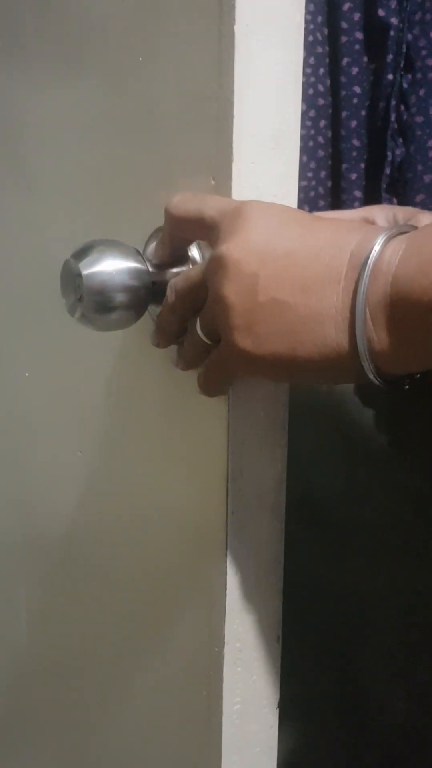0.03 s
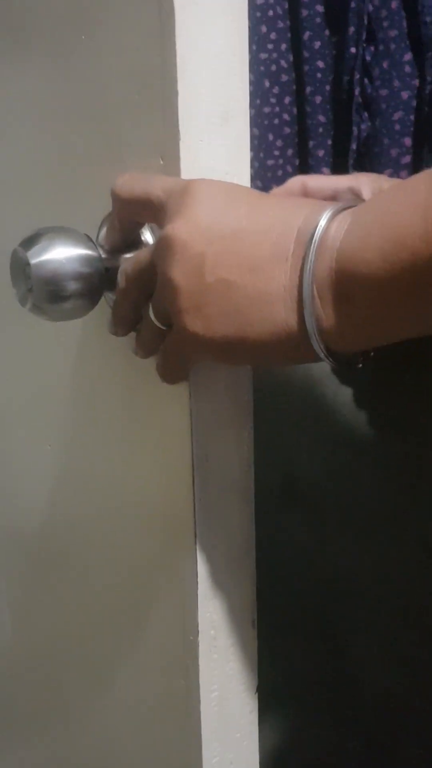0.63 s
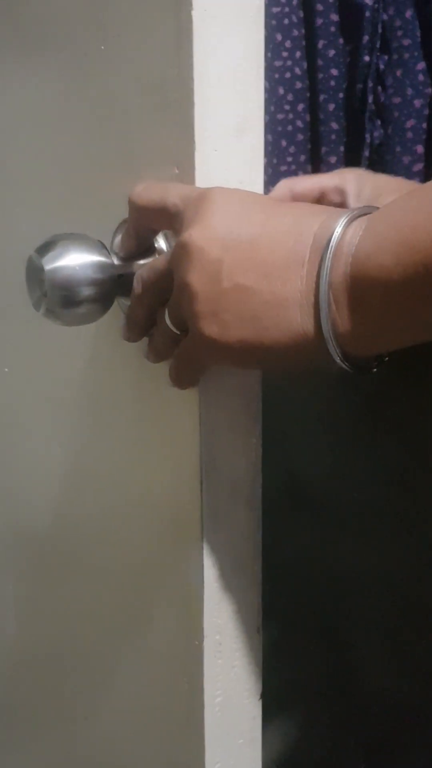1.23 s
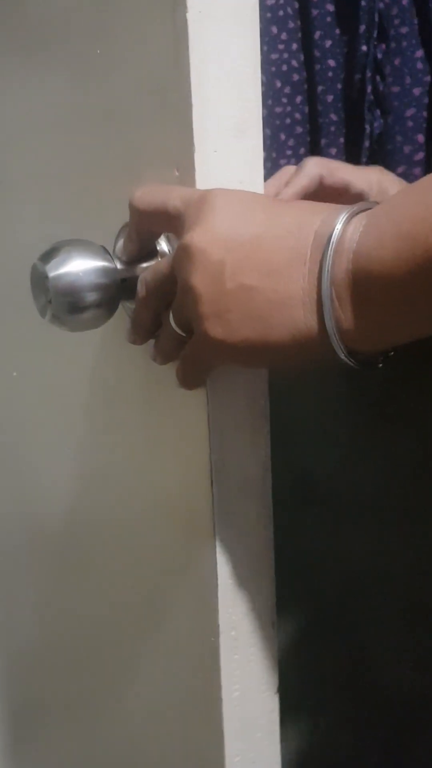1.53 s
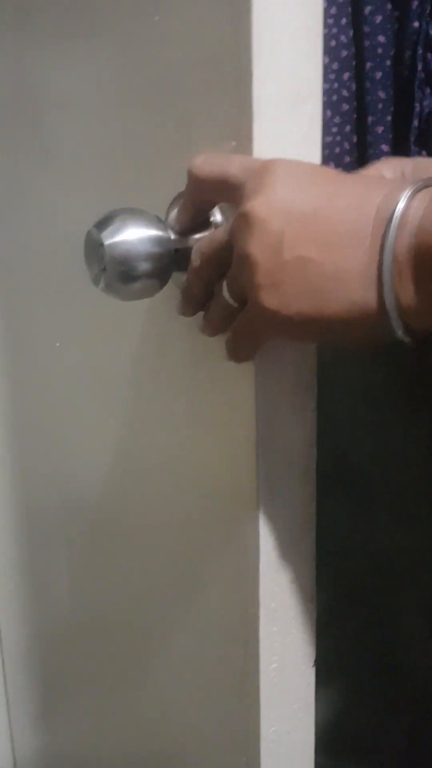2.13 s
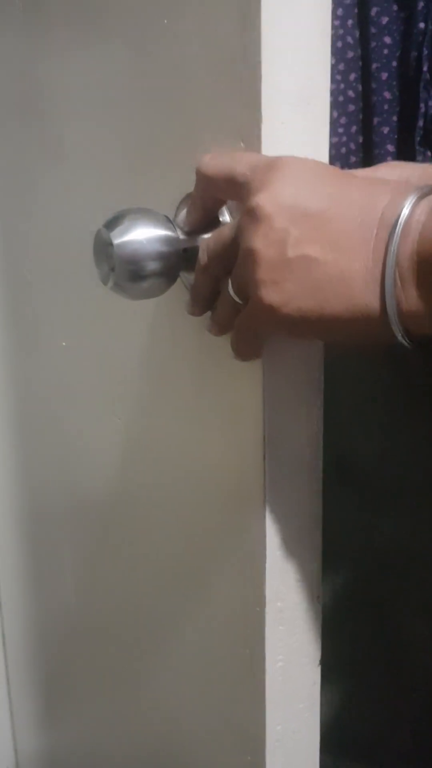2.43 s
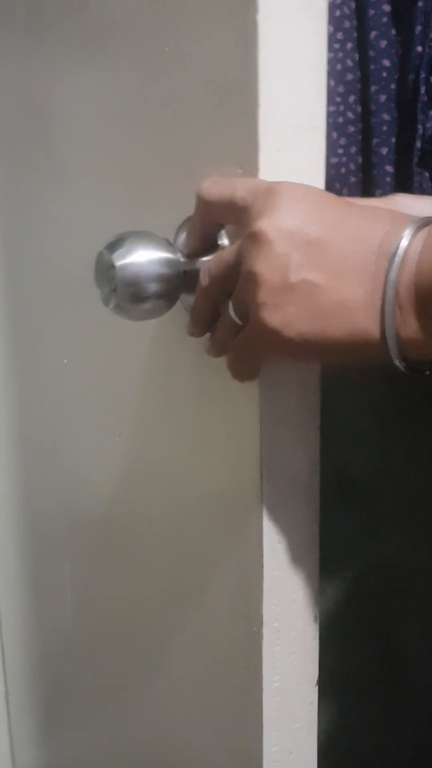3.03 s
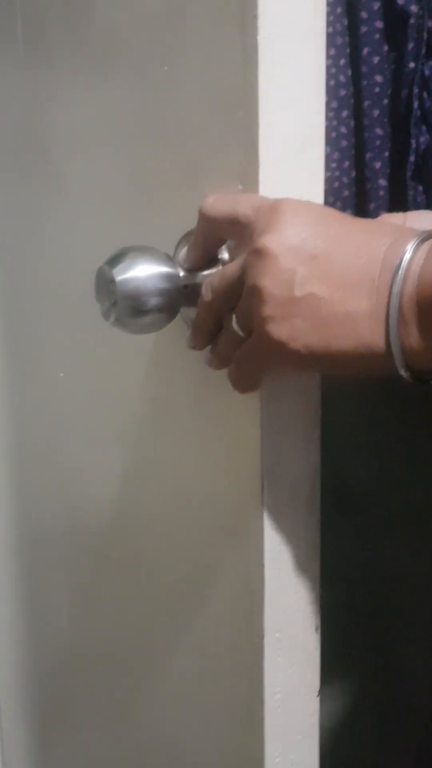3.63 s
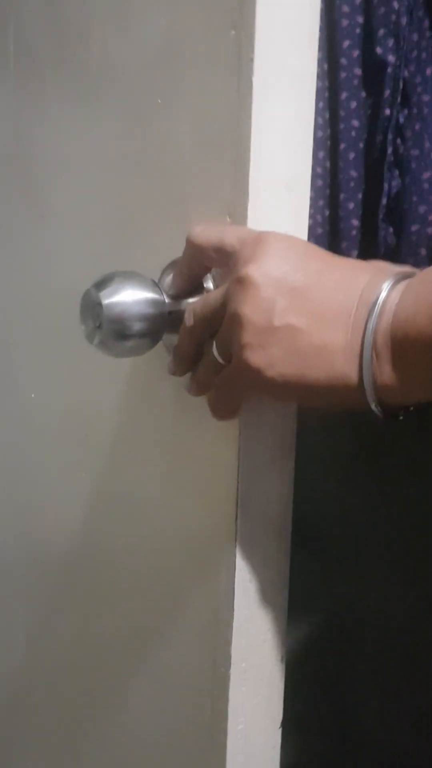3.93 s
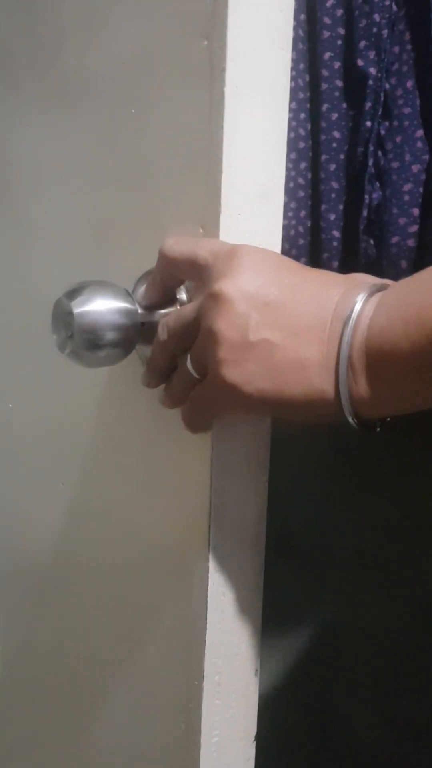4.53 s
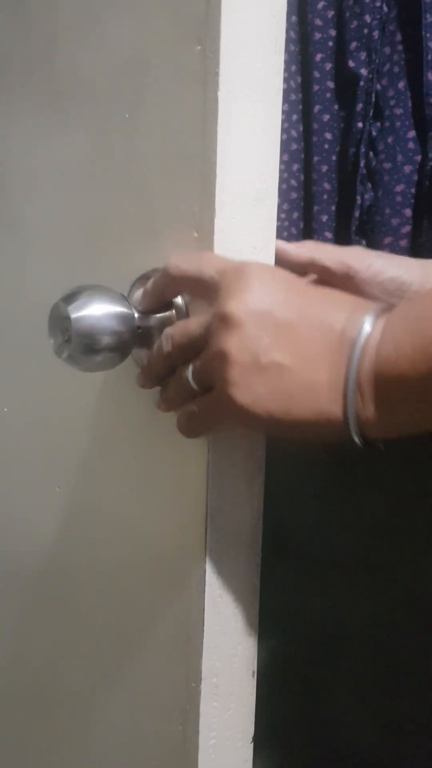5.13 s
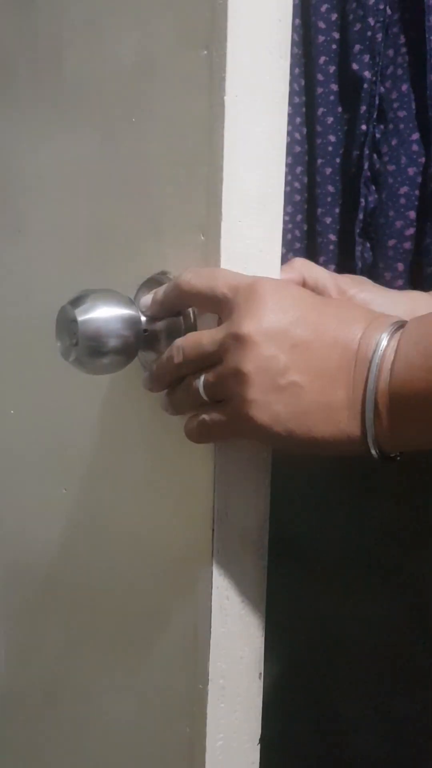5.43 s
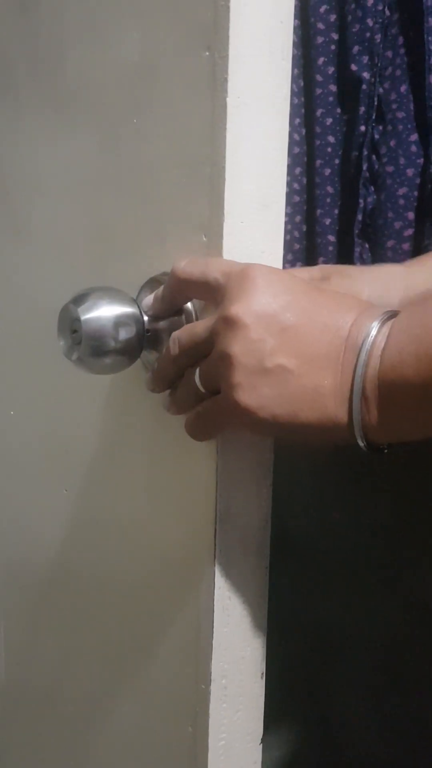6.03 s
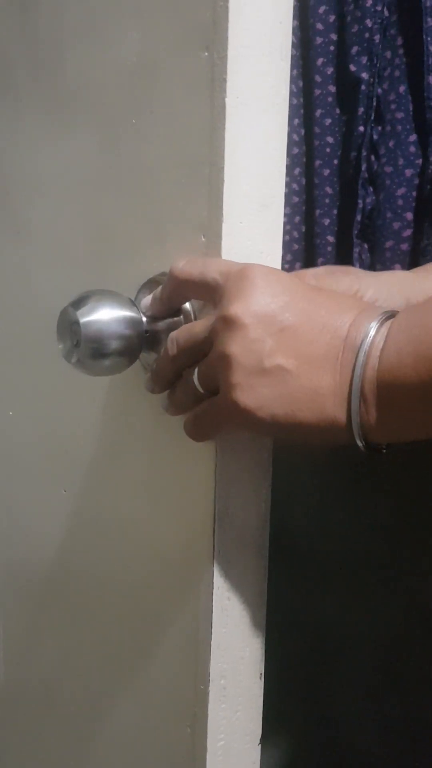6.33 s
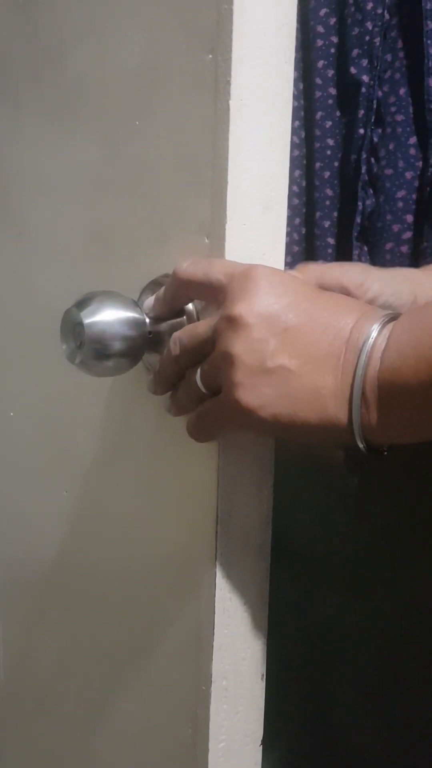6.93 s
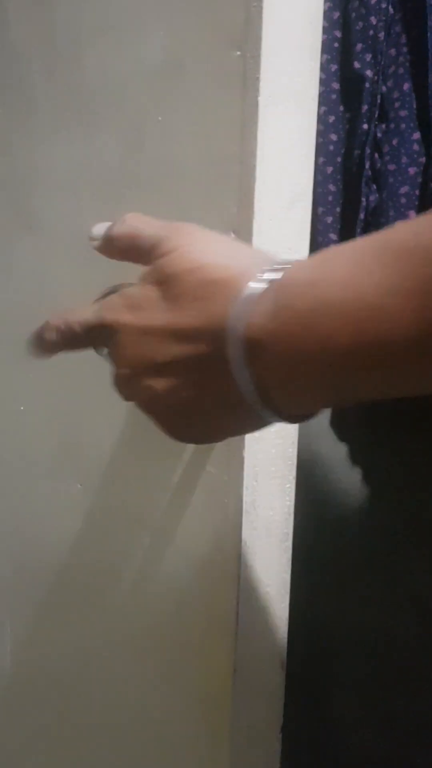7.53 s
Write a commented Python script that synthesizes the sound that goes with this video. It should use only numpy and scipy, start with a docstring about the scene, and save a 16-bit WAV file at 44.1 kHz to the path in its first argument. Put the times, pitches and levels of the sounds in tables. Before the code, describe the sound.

A hand jiggles a steel doorknob: loose metal chinks and ticks while the door rumbles softly. The door thuds with a clack, then the knob turns and the latch snaps home. After a few soft bumps come more rattling and three hard clacks, and a sleeve rustles faintly at the end. It is heard close up in a small, bare room with a brief ring and a low hush.

```python
"""A hand works a steel doorknob in a small bare room that rings briefly, over low room noise.
First the hand pushes and jiggles the door: it rumbles, loose steel chinks, the knob ticks and turns.
Near 2 seconds the door thuds with a clack; near 3 the bolt slides over its plate and snaps home.
Soft bumps and a faint brush of a sleeve follow, then more rattling and, from 5.7 seconds, three more clacks.
Last, the sleeve rustles as the hand lets go."""
import sys
import numpy as np
from scipy import signal
from scipy.fft import rfft, irfft, next_fast_len
from scipy.io import wavfile
from scipy.ndimage import map_coordinates

SR = 44100
rng = np.random.default_rng(int(sys.argv[2]) if len(sys.argv) > 2 else 0)


def to_wav(s):
    """Save 16-bit WAV."""
    ch = np.atleast_2d(s).T  # columns
    pcm = np.round(np.clip(ch, -1, 1) * 32767)  # PCM
    wavfile.write(sys.argv[1], SR, pcm.astype(np.int16))


N = 343539
TIME = np.arange(N) / SR
SIZE, LEAD = 24576, 350  # samples in one contact's sound, and of scraping before its blow
AGE = np.arange(SIZE) / SR  # seconds since a contact began
BINS = np.fft.rfftfreq(SIZE, 1 / SR)  # the frequencies in a contact [Hz]

# the hand's push on the door: (time [s], sway [dB], flexing [dB])
PUSH = [(0.0, -41, -58.5), (0.24, -41.5, -49.5), (0.5, -54, -51.5), (0.56, -43, -57), (1.47, -43, -39.5),
        (1.78, -51, -36.5), (1.89, -40.5, -47.5), (2.43, -50, -50), (3.01, -50.5, -54), (3.23, -56, -57.5),
        (4.79, -59.5, -60), (6.64, -54.5, -50), (6.79, -70, -56), (7.07, -49, -54), (7.18, -76, -53.5),
        (7.79, -56.5, -49)]
# the knob turns and draws the bolt: (start [s], end [s], effort [dB])
TURNS = [(0.579, 0.783, -58.5), (1.443, 1.75, -72), (2.576, 2.72, -43), (5.906, 6.064, -40),
         (6.577, 6.73, -39)]
# hard clacks; the first is a thud of the door, and in those with a long slide the bolt snaps home:
# (time [s], slide length [s], level [dB], catch above that level [dB], door weight [dB], brightness [dB])
CLACKS = [(2.138, 0.0013, -27, -32, 7, -9), (2.953, 0.027, -21.5, -13, 1.2, -1.5),
          (5.755, 0.0048, -28.5, -3, 3.5, -1), (6.329, .032, -22.5, -14, -2.5, -2),
          (6.931, 0.032, -22.5, -14.5, 1, -1.5)]
# the bright tone of a steel edge: (frequency [Hz], level [dB])
EDGE_TONE = [(300, -35), (2000, -15), (3300, -2), (5000, 0), (6400, -2), (7400, -4.5), (8700, -2),
             (11000, -4), (13000, -6), (15200, -5.5)]


def amp(db):
    """Turn decibels into a gain."""
    return 10 ** (np.asarray(db) / 20)


def unit(x):
    """Scale to an average power of 1."""
    return x / np.sqrt(np.mean(np.abs(x) ** 2) + 1e-20)


def along(points, hz):
    """Read between (frequency, value) points on a log frequency axis."""
    frequencies, values = np.transpose(points)
    return np.interp(np.log(hz + 1), np.log(frequencies + 1), values)


def curves(rows):
    """Turn each column after the time into one value per sample."""
    times, *columns = np.transpose(rows)
    return [np.interp(TIME, times, column) for column in columns]


def gate(start, end, ramp):
    """A stroke that rises, holds and falls."""
    return np.clip(np.minimum(TIME - start, end - TIME) / ramp, 0, 1)


def add(track, time, sound):
    """Mix a sound in at a time in seconds."""
    part = track[:, max(round(time * SR), 0):][:, :sound.shape[-1]]
    part += sound[..., :part.shape[-1]]


def filtered(x, response):
    """Give each frequency the gain response(hz)."""
    length = next_fast_len(x.shape[-1] + SR // 4)
    hz = np.fft.rfftfreq(length, 1 / SR)
    return irfft(rfft(x, length) * response(hz), length)[..., :x.shape[-1]]


def coloured_noise(tone):
    """Stereo noise with this tone, at power 1."""
    return unit(filtered(rng.standard_normal((2, N)), lambda hz: amp(along(tone, hz))))


def causal(level_db):
    """A filter with this shape that answers only after it is hit (minimum phase), at power 1."""
    cepstrum = irfft(np.log(amp(level_db)))
    cepstrum[1:SIZE // 2] *= 2
    cepstrum[SIZE // 2 + 1:] = 0
    return unit(np.exp(rfft(cepstrum)))


def resonances(peaks, hz):
    """A filter made of peaks: (pitch [Hz], width [Hz], level [dB])."""
    return sum((-1) ** k * amp(db) * 1j * hz * width / (pitch ** 2 - hz ** 2 + 1j * hz * width)
               for k, (pitch, width, db) in enumerate(peaks))


def ringing(modes, attack):
    """A struck part rings in fading tones, its modes, at slightly new strengths each time."""
    hz, db, decay_s = np.transpose(modes)[:, :, None]
    strength = unit(amp(db + 2 * rng.standard_normal(hz.shape))) / np.sqrt(len(hz))
    sign = (-1) ** np.arange(len(hz))[:, None]
    tones = sign * strength * amp(-60 * AGE / decay_s) * np.sin(2 * np.pi * hz * AGE)
    return tones.sum(0) * (1 - np.exp(-AGE / attack))


def grains(length, rate, spread_db):
    """Tiny slips of uneven size, about rate of them a second."""
    slips = (rng.random(length) < rate / SR) * rng.standard_normal(length)
    return unit(slips * amp(spread_db * rng.standard_normal(length)))


def room_tail(build=0.0027):
    """Echoes off the walls blur into fading noise; the treble dies first."""
    # how long the room rings: (frequency [Hz], time to fade 60 dB [s])
    ring_times = [(100, 0.66), (400, 0.5475), (1200, 0.3779), (4000, 0.3864), (9000, 0.3239), (15000, 0.34)]
    hz, age, spectra = signal.stft(rng.standard_normal((2, SIZE)), SR, nperseg=256)
    decay = amp(-60 * age / along(ring_times, hz)[:, None])
    _, tail = signal.istft(spectra * decay, SR, nperseg=256)
    return tail[:, :SIZE] * (1 - np.exp(-AGE / build))


def in_room(x):
    """A sound spread by the room's echoes, at about the same power."""
    tail = room_tail()
    return signal.fftconvolve(x[None], tail / np.linalg.norm(tail[0]), axes=1)


def force_through_room(force, tone):
    """Slips take on the tone of the thing they shake, then spread through the room."""
    body = irfft(causal(along(tone, BINS)))
    return in_room(signal.fftconvolve(force, body)[:N])[:, :N]


def room_noise():
    """The room's low, steady hush."""
    # tone of the hush: (frequency [Hz], level [dB])
    air_tone = [(22, -45), (48, -12.5), (125, -8.5), (200, -8), (400, -16.5), (800, -22.5), (1150, -20.5),
                (1700, -26), (2200, -33), (3000, -42), (7500, -48), (12000, -43), (15500, -38.5)]
    return amp(-54.5) * coloured_noise(air_tone)


def door():
    """Pushing sways the door and flexes its panel; the palm rubs as it shifts and turns the knob."""
    # the palm shifts on the door: (start [s], end [s], level [dB])
    rubs = [(0.423, 2.14, -50), (3.317, 2.8, -52.5), (5.202, 5.563, -59), (7.32, 8.9, -56.5)]
    # tone of the rubbing palm: (frequency [Hz], level [dB])
    rub_tone = [(100, -18), (220, 2), (320, -2.5), (600, -9.5), (1200, -12), (2200, -20.5), (4000, -29.5),
                (15000, -40.5)]

    def rumble(peaks):
        return unit(filtered(rng.standard_normal((2, N)), lambda hz: np.abs(resonances(peaks, hz)) ** 2))
    sway_db, flex_db = curves(PUSH)
    # the grip starts just before each turn and ends just after it
    grips = [(start - 0.037, end + 0.018, db - 5.5) for start, end, db in TURNS]
    pressure = sum(amp(db) * gate(start, end, ramp=0.021) for start, end, db in [*rubs, *grips])
    sway = amp(sway_db + 3) * rumble([(51.0, 25, 0)])
    bend = np.hypot(amp(flex_db + 4), amp(-3) * pressure)
    flex = bend * rumble([(84, 18.6, 0.5), (121.2, 9.9, 3.5), (148.3, 28, -3.0)])
    return sway + flex + force_through_room(pressure * grains(N, rate=700, spread_db=3), rub_tone)


def chinks(reach_octaves=0.3):
    """Loose steel parts ring, mostly near the pitch that each touch favours."""
    # touches on the loose steel: (time [s], level [dB], favoured pitch [Hz])
    touches = [(0.143, -54, 9200), (0.778, -41, 2700), (0.904, -35, 3970), (0.907, -42.5, 5570),
               (0.909, -42.5, 11400), (1.326, -42.5, 4020)]
    # ringing tones of the steel: (pitch [Hz], level [dB], time to fade 60 dB [s])
    steel_modes = [(2490, 7, .3), (2714, 9, 0.16), (2880, -18, .3), (4024, -6, 0.16), (3950, -6.5, 0.22),
                   (4180, -4, 0.19), (5750, -0.5, 0.15), (6200, -12, 0.26), (7250, 2, .25),
                   (9100, -2, 0.74), (9350, -27, .2), (10300, -12, .2), (11240, -9, .22), (14500, -3, .2)]
    out = np.zeros((2, N))
    for time, db, pitch_hz in touches:
        modes = [(hz, level - 6 * (np.log2(hz / pitch_hz) / reach_octaves) ** 2, decay_s)
                 for hz, level, decay_s in steel_modes]
        ring = ringing(modes, attack=0.00014)
        flare = ring * np.exp(-AGE / .0015)  # the fingers damp the first flare
        echo = in_room(flare)[:, :SIZE]
        add(out, time, amp(db + 1) * (amp(-13) * ring + amp(8) * flare + amp(19) * echo))
    return out


def contacts():
    """Every tick, bump, clunk and clack as its time followed by its level at each part."""
    # the knob ticks against its steel collar: (time [s], level [dB], brightness [dB])
    ticks = [(0.149, -41, -1), (0.422, -47.5, 9), (0.722, -49.5, -2), (0.782, -39.5, -1.5),
             (0.907, -47.5, 8), (1.073, -36.5, -7.5), (1.229, -42.5, -4), (1.32, -47, 7),
             (1.334, -41.5, 4.5), (1.483, -43, -3), (1.585, -44, -5.5), (1.642, -41, -18),
             (1.672, -41.5, 2.5), (1.743, -44.5, -5.5), (1.878, -37.5, -6), (2.371, -58, 0),
             (2.577, -39.5, -8), (2.62, -39, -2.5), (2.674, -42, -7), (2.711, -41.5, -11),
             (5.421, -43.5, -1), (5.928, -42, -11), (5.999, -39, -11), (7.312, -53.5, 1)]
    # soft bumps of the door: (time [s], level [dB])
    bumps = [(0.932, -39), (1.347, -38), (1.69, -40), (3.27, -36.5), (3.444, -51.5), (4.0, -46.5),
             (4.457, -46), (5.334, -40), (5.727, -43.5), (6.551, -40.5)]
    # the knob's shaft takes up its slack in the latch case: (time [s], level [dB], brightness [dB])
    clunks = [(1.25, -43.5, -3), (1.513, -42, -24), (1.851, -43.5, -37), (4.997, -35.5, -13),
              (5.432, -41.5, -27), (5.957, -34.5, 2), (6.27, -53.5, -19), (6.646, -37, 1.5),
              (6.708, -37.5, -5)]
    # how strongly each kind of contact reaches the parts:
    # (door thump [dB], panel knock [dB], case jolt [dB], case ring [dB], bolt [dB], steel edge [dB])
    tick_mix = (-4.5, -0.5, -4, -4.5, -5, -4)
    bump_mix = (-10.5, -2, -12, -15, -20, -53)
    clunk_mix = (-6.5, -2.5, 1, -3, -5.5, -17.5)
    clack_mix = (-9.5, -1, 4, -1.5, -5, -1.5)

    def touch(time, db, mix, bright=0, weight=0):
        # weight goes to the door; brightness to the steel edge and a little to the bolt
        return time, db + np.add(mix, [weight, weight, 0, 0, 0.21 * bright, bright])
    hits = [touch(time, db, clack_mix, bright, weight) for time, _, db, _, weight, bright in CLACKS]
    # a dull catch comes just before each clack
    hits += [touch(time - slide, db + catch, clunk_mix, bright=-8) for time, slide, db, catch, *_ in CLACKS]
    hits += [touch(time, db, tick_mix, bright) for time, db, bright in ticks]
    hits += [touch(time, db, clunk_mix, bright) for time, db, bright in clunks]
    hits += [touch(time, db, bump_mix) for time, db in bumps]
    _, flex_db = curves(PUSH)
    lean_db = 0.19 * (flex_db - flex_db.mean())  # the door thumps more while the hand leans on it
    return [(time, thump_db + lean_db[round(time * SR)], *others) for time, (thump_db, *others) in hits]


def strike(lag, bounce, bounce_db, far_db):
    """Spectrum of one hit with its rebounds and near echoes; later and weaker on the right."""
    rebounds = np.array([grains(SIZE, rate=500, spread_db=2) for _ in range(2)]) * np.exp(-AGE / bounce)
    force = amp(bounce_db) * rebounds / np.linalg.norm(rebounds, axis=1, keepdims=True)
    force[:, 0] += 1  # the hit itself
    far_side = amp(far_db) * np.exp(-2j * np.pi * BINS * lag)
    return rfft(force) * np.array([np.ones_like(BINS), far_side])


def ripple(depth_db, step_hz):
    """Each touch favours new pitches: smooth random rises and dips across the frequencies."""
    return depth_db * map_coordinates(rng.standard_normal(256), [BINS / step_hz], mode="wrap")


def slide_in(slide_db):
    """Parts scrape just before they meet: the spectrum of a swell of tiny slips, then the blow."""
    swell = np.exp(-3 * AGE[LEAD:0:-1] / AGE[LEAD]) * rng.standard_normal(LEAD)
    return rfft(np.append(amp(slide_db) * swell / np.linalg.norm(swell), 1), SIZE)


def latch():
    """Each contact cracks at the steel edge, knocks in the bolt and its case, and shakes the door."""
    # resonances of the latch case and of the bolt: (pitch [Hz], width [Hz], level [dB])
    case_peaks = [(934, 74, 11.5), (1259, 132, 8), (1737, 130, 4.5)]
    bolt_peaks = [(2016, 640, -4.5), (2207, 300, 3), (2610, 240, -2.5), (2927, 145, 0), (3400, 3700, -10.5)]
    # the door's dull thud: (frequency [Hz], level [dB])
    thud_tone = [(30, -35), (120, -18), (200, -13), (300, 0), (400, -1), (500, -3.5), (650, -4), (850, -9),
                 (1200, -22), (2500, -45), (8000, -80)]
    # the panel's ringing and the door's deep bending: (pitch [Hz], level [dB], time to fade 60 dB [s])
    panel_modes = [(250, -4, .3), (303, 0, .3), (318, -2, .28), (366, -6, .28), (397, -8, .28),
                   (570, -8, .25), (654, -11, .22), (800, -10, .2), (865, -10, .22)]
    bending_modes = [(83, -3, .45), (118, 0, .4), (145, -7, .3), (190, -12, .25)]
    rise_s = .0027  # the heavy door takes a moment to get moving
    thud = causal(along(thud_tone, BINS))
    steel_db = along(EDGE_TONE, BINS)
    case, bar = unit(resonances(case_peaks, BINS)), unit(resonances(bolt_peaks, BINS))
    jolt = unit(resonances([(1190, 800, 0)], BINS) ** 2)  # the case's first push lasts about two cycles
    direct_treble = amp(along([(4000, -0.5), (13000, -5)], BINS))
    fade = np.clip((AGE[-1] - AGE) / .1, 0, 1) ** 2
    out = np.zeros((2, N))
    for time, thump_db, panel_db, jolt_db, case_db, bolt_db, edge_db in contacts():
        direct = strike(lag=0.00041, bounce=0.009, bounce_db=-4.5, far_db=-8.0)
        room = room_tail(build=0.00049)
        echo = rfft(room)
        edge = causal(steel_db + ripple(depth_db=1.4, step_hz=220))
        crack = amp(edge_db) * edge * (amp(27) * direct_treble * direct + amp(-0.5) * echo)
        clack = amp(bolt_db) * bar * (amp(23.5) * direct + echo)
        knock = amp(jolt_db + 29) * jolt * direct + amp(case_db) * case * echo
        wood = amp(panel_db + .5) * thud * rfft(room * (1 - np.exp(-AGE / rise_s)))
        ring = amp(panel_db + 4.5) * ringing(panel_modes, attack=2 * rise_s)
        thump = amp(thump_db + 9) * ringing(bending_modes, attack=0.013)
        blow = irfft((crack + clack + knock + wood) * slide_in(slide_db=-14.0))
        add(out, time - LEAD / SR, blow * fade)
        add(out, time, (ring + thump) * fade)
    return out


def sliding_bolt(linger_s=0.1):
    """Small slips chatter in the lock and hiss on the plate: even in a turn, swelling in a slide."""
    # tone of the chatter: (frequency [Hz], level [dB])
    scrape_tone = [(60, -8), (300, 0), (700, -2), (1500, -11), (2600, -13), (4000, -16), (8000, -36.5),
                   (15500, -29.5)]
    chatter_db_per_s, hiss_db_per_s = 349.5, 850.5  # the hiss swells later and faster
    chatter, plate = np.zeros((2, N))
    for start, end, effort_db in TURNS:
        stroke = gate(start, end, ramp=0.0054)
        chatter += amp(effort_db) * stroke
        plate += amp(-63.5) * stroke
    for time, slide, db, *_ in CLACKS:
        stroke = amp(db) * gate(time - slide, time, ramp=0.0011)
        time_left = np.clip(time - TIME, 0, slide)
        chatter += amp(-1.5 - chatter_db_per_s * time_left) * stroke
        plate += amp(2 - hiss_db_per_s * time_left) * stroke
    # the hiss builds up and lingers in the room
    decay = amp(-60 * AGE / linger_s) ** 2
    power = np.abs(signal.fftconvolve(plate ** 2, decay / decay.sum())[:N])
    hiss = np.sqrt(power) * coloured_noise(EDGE_TONE)
    return hiss + force_through_room(chatter * grains(N, rate=700, spread_db=10.0), scrape_tone)


def sleeve():
    """Cloth and skin brush past in a rise and fall, loudest as the hand lets go."""
    # brushes of sleeve and hand: (start [s], length [s], level [dB])
    brushes = [(3.745, 0.17, -64.5), (7.25, 0.63, -48)]
    # tone of the cloth: (frequency [Hz], level [dB])
    cloth_tone = [(120, -25), (220, -13.5), (420, 5.5), (900, -8), (2600, -11), (5000, -20.5),
                  (15500, -25.5)]
    sweep = sum(amp(db) * np.sin(np.pi * np.clip((TIME - start) / length, 0, 1))
                for start, length, db in brushes)
    return force_through_room(sweep * grains(N, rate=3000, spread_db=7.5), cloth_tone)


def scene():
    """All the sounds together: the door is to the left, and the bass is much alike on both sides."""
    # how far the door's sounds lean left: (frequency [Hz], left over right [dB])
    lean = [(60, 1), (125, 5.9), (250, 2.4), (600, 7.1), (1200, 1.67), (2200, 1.1), (8000, 2.4),
            (13000, 0.5)]
    # stereo width: (frequency [Hz], gain of the side signal [dB])
    width = [(60, -16), (125, -14.5), (250, -6.5), (500, -5.5), (1000, 0), (15000, 0.5)]
    near = latch() + chinks() + sliding_bolt() + door() + sleeve()
    near = filtered(near, lambda hz: amp(np.outer([.5, -.5], along(lean, hz))))
    left, right = near + room_noise()
    mid = (left + right) / 2
    side = filtered((left - right) / 2, lambda hz: amp(along(width, hz)))
    return np.array([mid + side, mid - side])


def record(dry):
    """The recorder cuts the deepest bass, rounds the tallest peaks and drops the highest treble."""
    low_hz, top_hz, ceiling = 38, 15400, .88
    thinned = filtered(dry, lambda hz: (hz / low_hz) ** 6 / np.sqrt(1 + (hz / low_hz) ** 12))
    rounded = thinned / (1 + np.abs(thinned / ceiling) ** 6) ** (1 / 6)
    return filtered(rounded, lambda hz: 1 / np.sqrt(1 + (hz / top_hz) ** 200))


dry = scene()
out = record(dry)
to_wav(out)
```